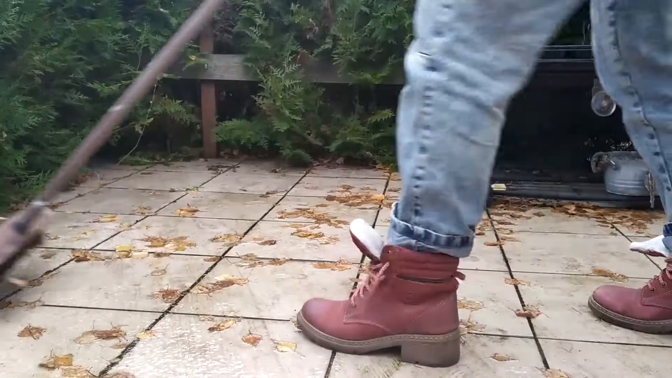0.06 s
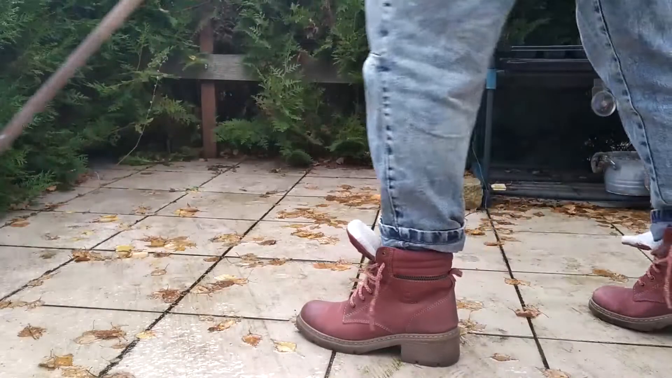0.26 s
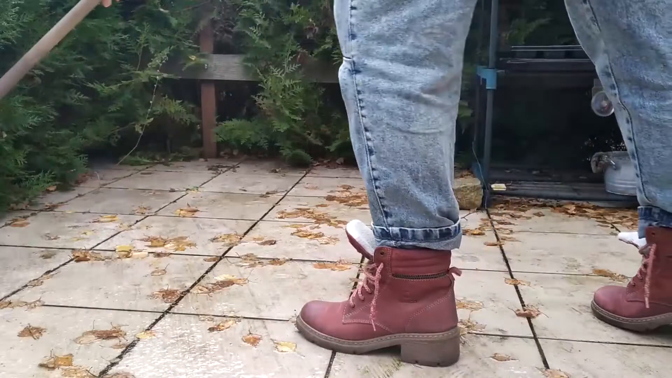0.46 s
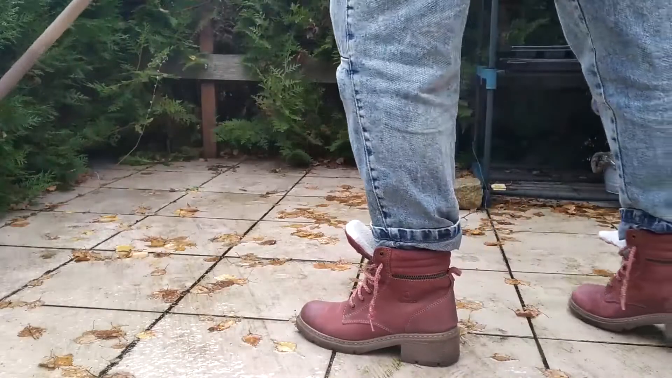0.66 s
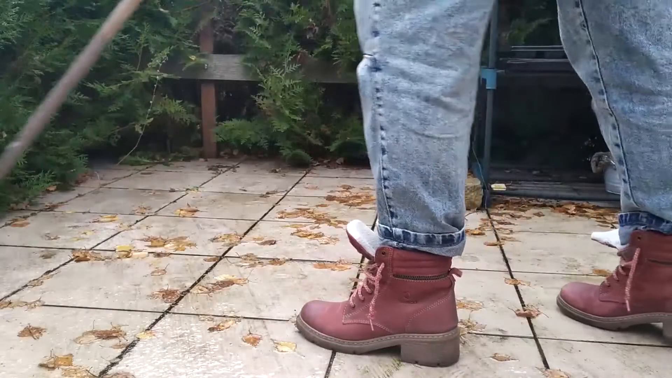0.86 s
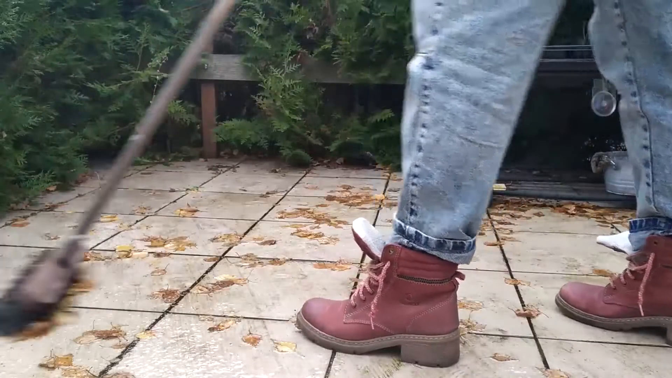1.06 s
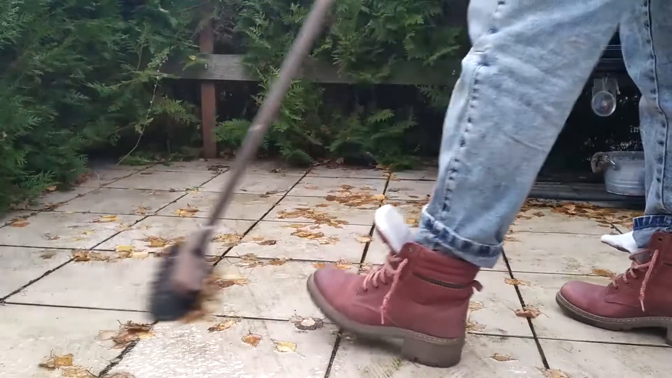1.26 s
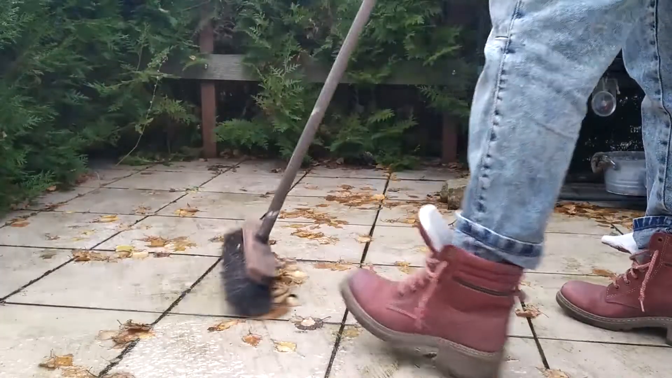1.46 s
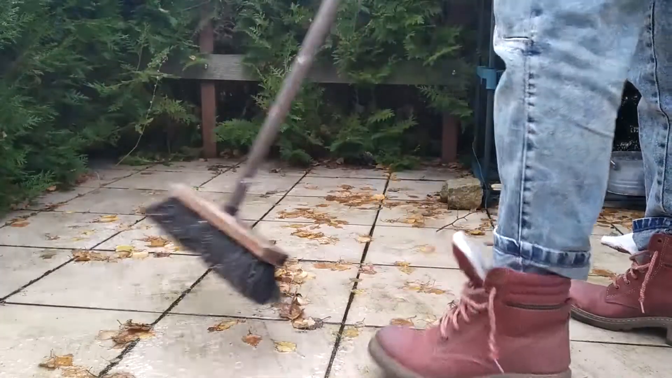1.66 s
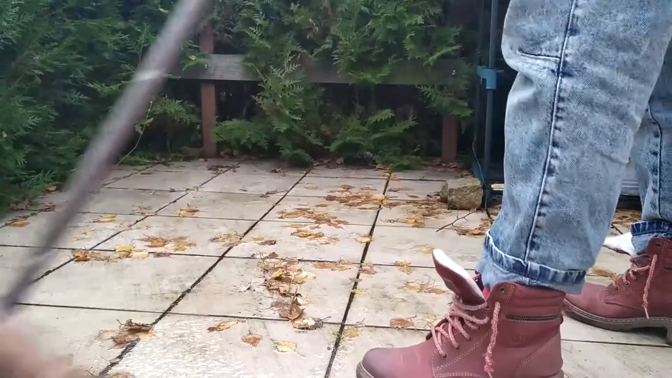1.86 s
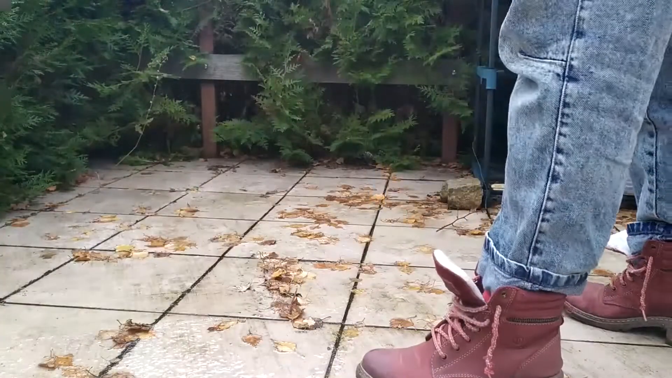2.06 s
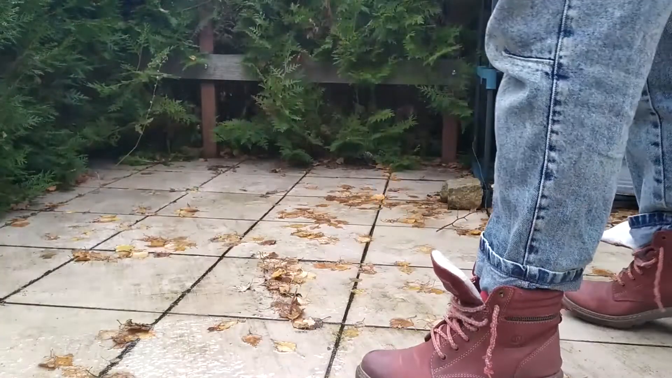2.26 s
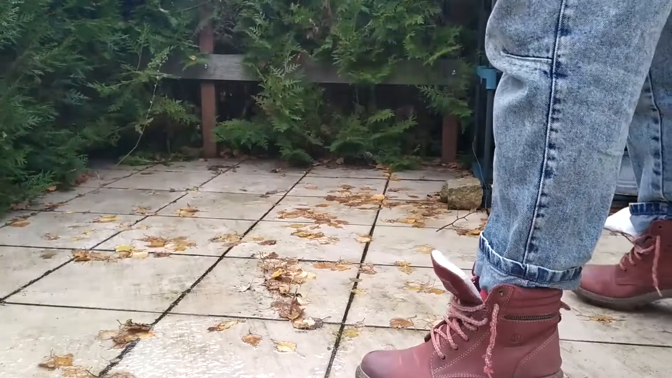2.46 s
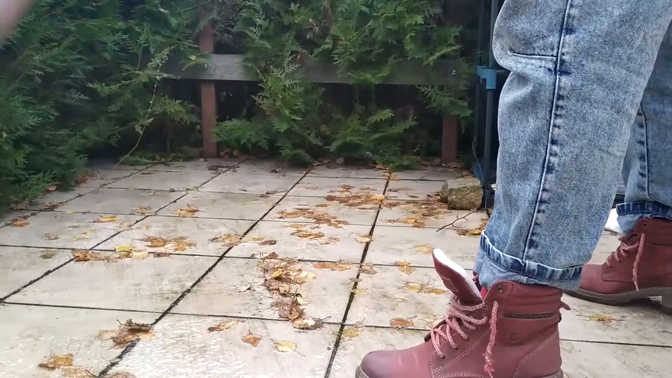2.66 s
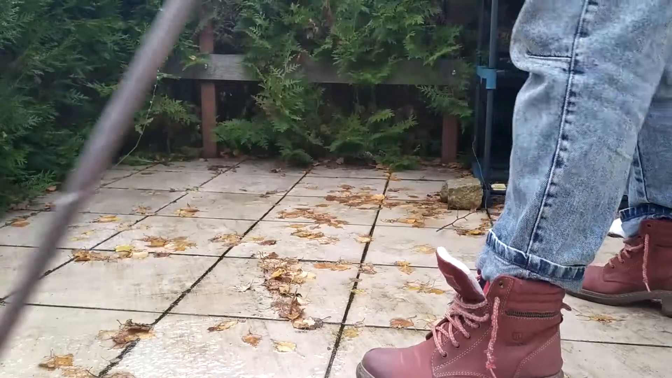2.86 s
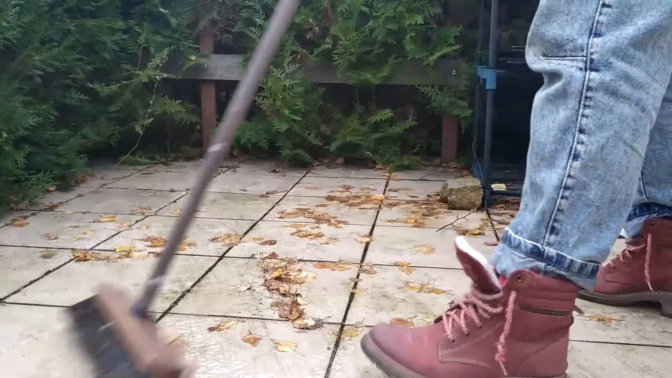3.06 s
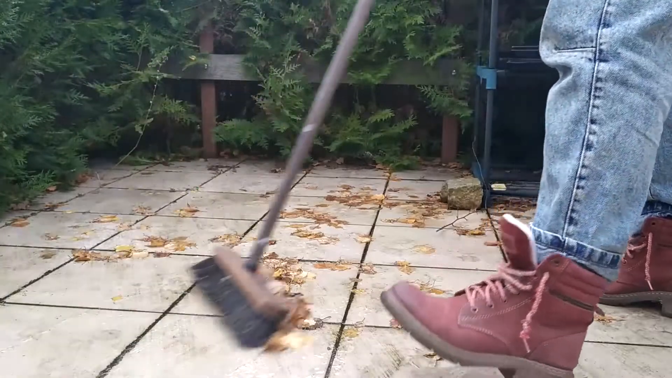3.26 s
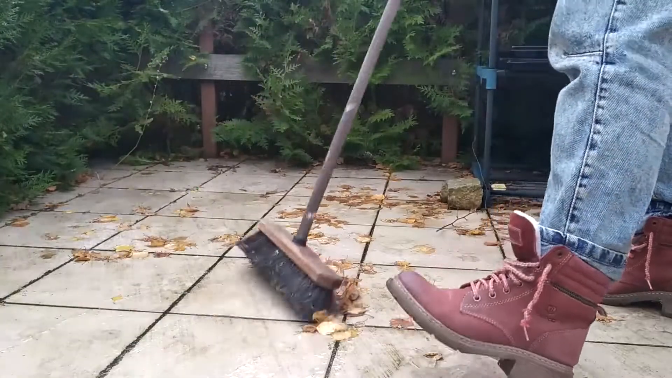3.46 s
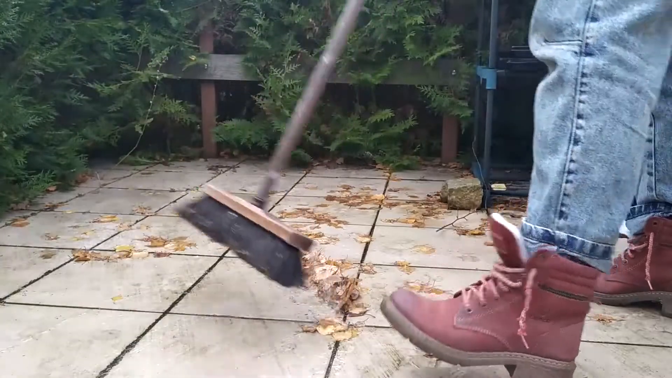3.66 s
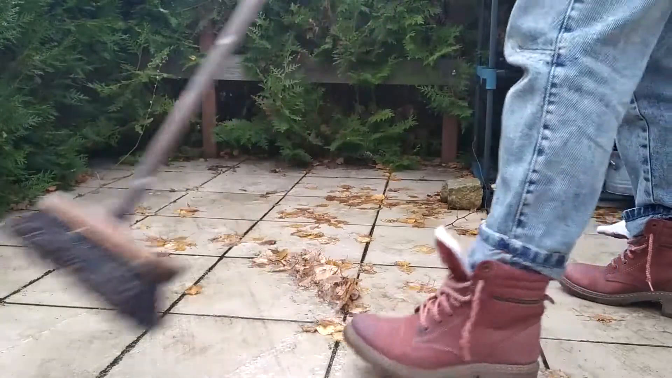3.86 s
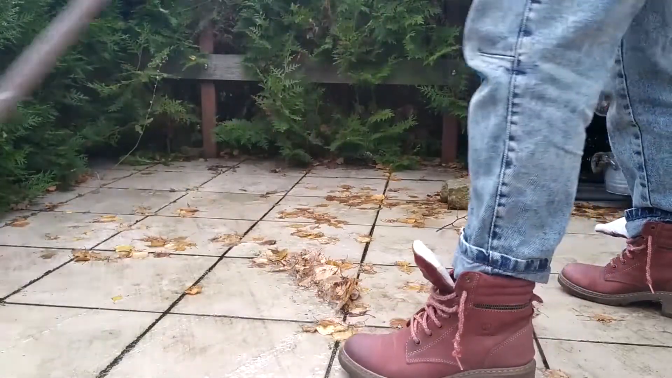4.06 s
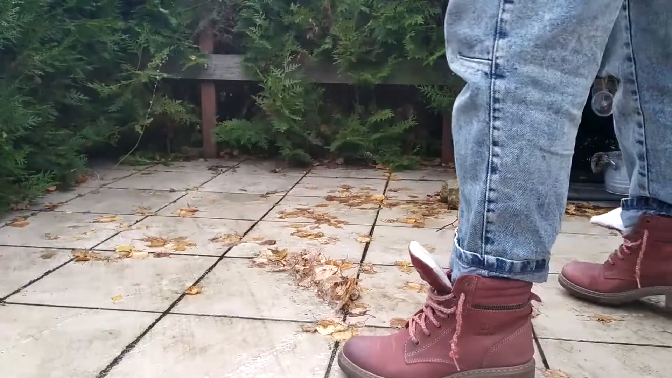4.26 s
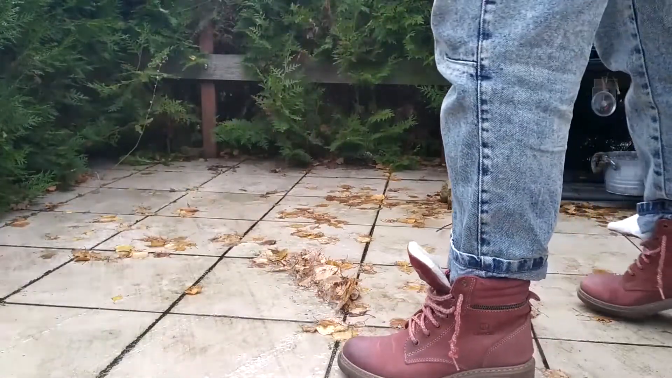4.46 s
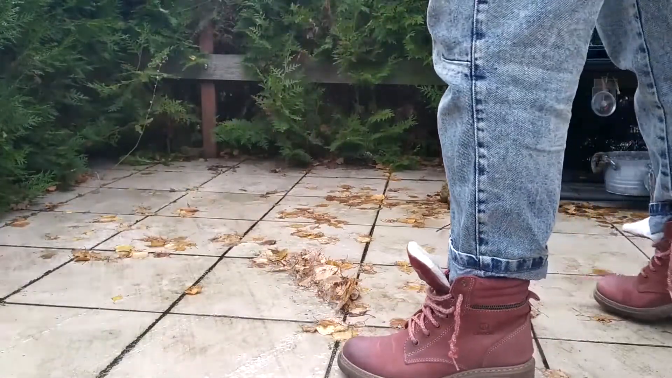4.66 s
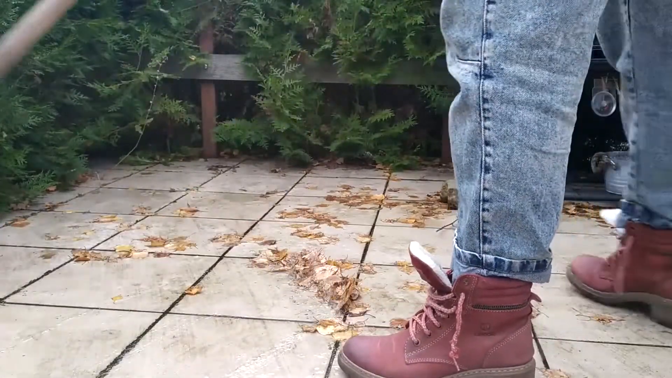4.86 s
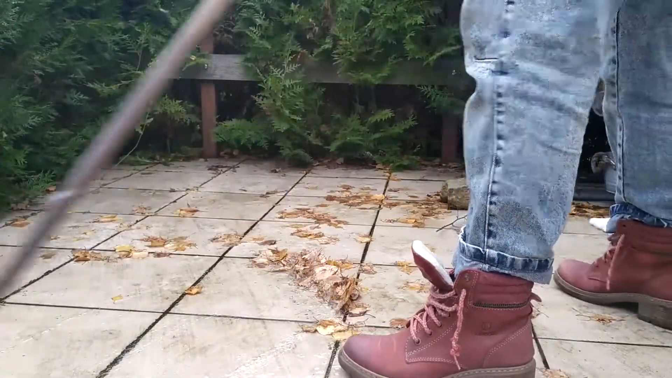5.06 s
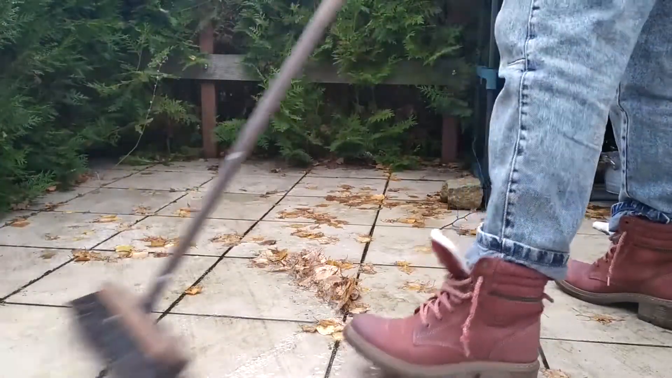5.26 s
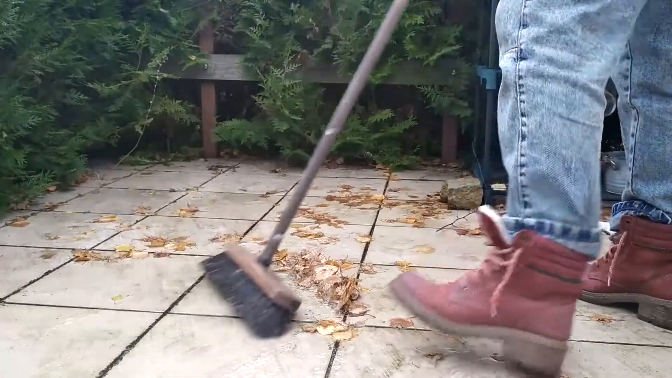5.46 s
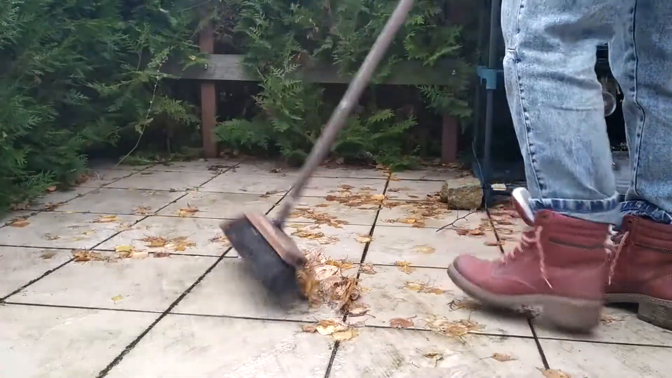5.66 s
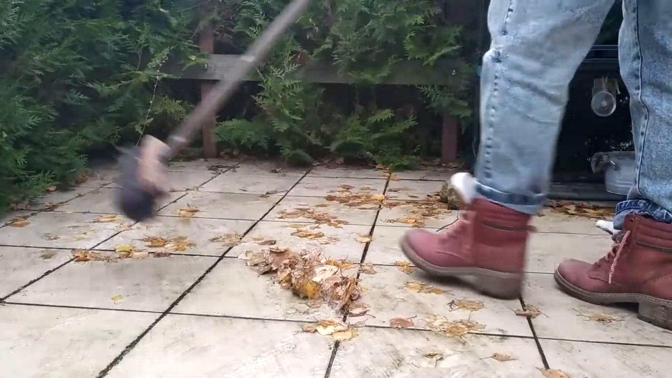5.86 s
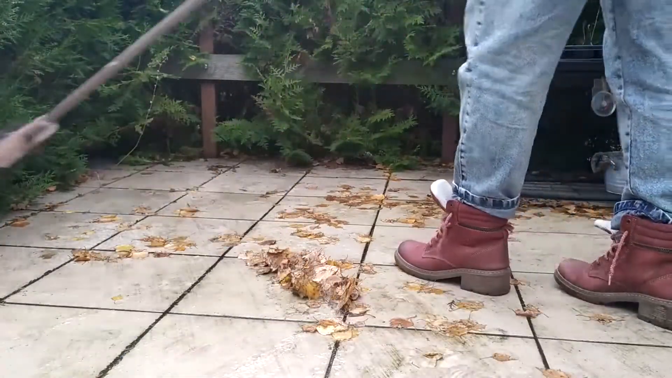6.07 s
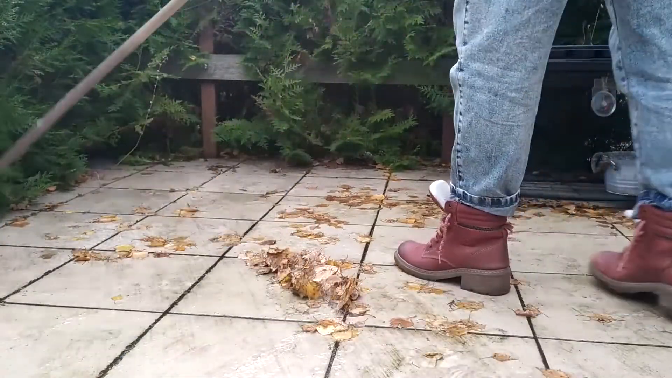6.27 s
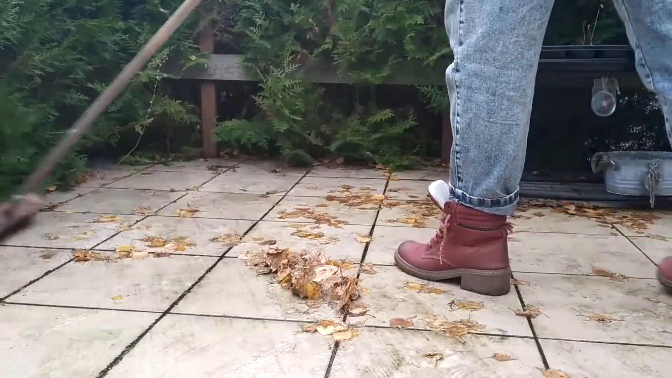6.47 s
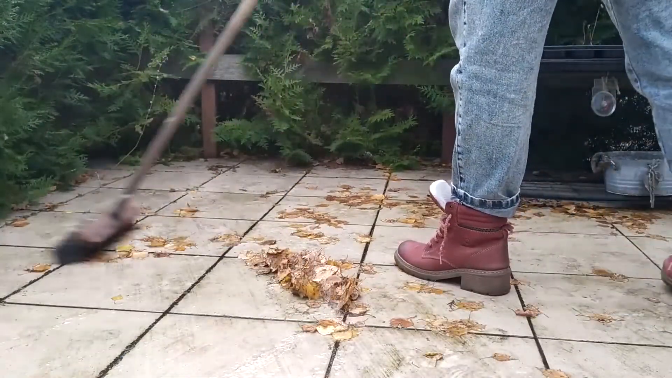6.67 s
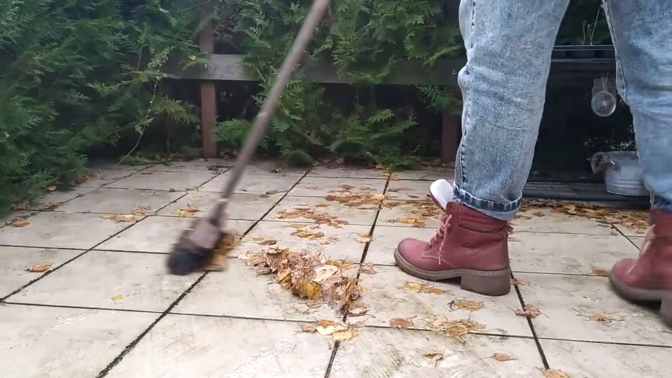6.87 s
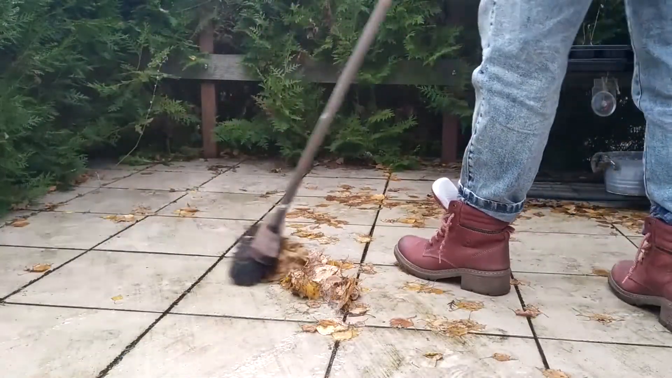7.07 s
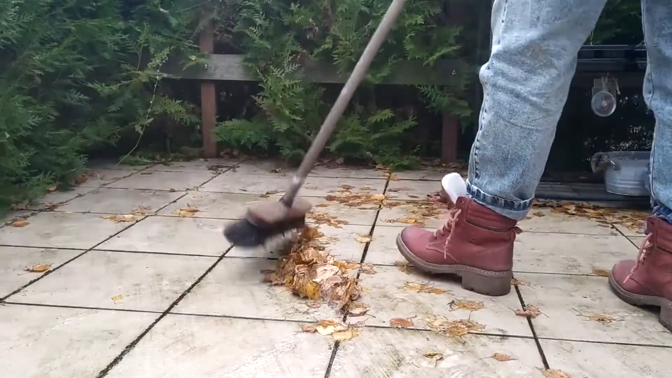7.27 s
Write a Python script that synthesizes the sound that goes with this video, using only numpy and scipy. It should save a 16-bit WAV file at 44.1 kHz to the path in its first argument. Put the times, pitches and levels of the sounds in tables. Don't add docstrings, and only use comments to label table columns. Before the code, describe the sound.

A stiff broom sweeps dry leaves over paving slabs in five bright, bristly strokes, with leaf snaps, soft boot knocks and faint distant traffic.

```python
import sys
import numpy as np
from scipy import signal
from scipy.io import wavfile
from scipy.ndimage import uniform_filter1d, map_coordinates

SR = 44100
rng = np.random.default_rng(int(sys.argv[2]) if len(sys.argv) > 2 else 0)


def volts(x):
    e = np.asarray(x, float) / 20
    return 10 ** e


def to_wav(s):
    ch = np.atleast_2d(s).T
    pcm = np.round(np.clip(ch, -1, 1) * 32767)
    wavfile.write(sys.argv[1], SR, pcm.astype(np.int16))


N = 322371

# t/s, hiss level (pressure)/dB, lag of left port/ms
STROKES = [
    [(0.25, -69, .2), (0.3, -53.5, 0.29), (0.38, -52, 0.25), (0.46, -54.5, 0.32), (0.56, -54, 0.29),
     (0.64, -76, 0.18)],
    [(0.64, -67, 0.21), (0.72, -54.5, 0.32), (0.86, -52, 0.28), (0.93, -47.5, 0.27), (1.06, -47, 0.24),
     (1.28, -52, 0.14), (1.42, -52.5, 0.064), (1.585, -58, 0.034), (1.68, -75.5, .03)],
    [(2.47, -61, 0.36), (2.54, -59, 0.43), (2.71, -48, 0.35), (2.89, -46.5, 0.33), (3.1, -46, 0.16),
     (3.36, -49.5, .09), (3.5, -54, .004), (3.65, -69, .003), (3.73, -83, .02)],
    [(4.59, -63, 0.44), (4.73, -52, 0.42), (4.91, -46.5, .36), (5.1, -46, 0.3), (5.3, -46, 0.17),
     (5.46, -46.5, 0.081), (5.68, -52.5, 0.051), (5.76, -68.5, 0.038), (5.83, -86, .04)],
    [(6.47, -62.5, 0.23), (6.6, -52.5, 0.26), (6.76, -49, 0.15), (6.86, -49.5, 0.12), (6.97, -53.5, 0.13),
     (7.04, -53.5, 0.085), (7.19, -52.5, 0.045), (7.31, -66, .015)],
]
# scrape re hiss at start/dB, at end/dB,
# brightness re hiss at start/dB, at end/dB, extra scatter of a head set askew/dB
GROUND = [
    (-11.5, -20, 0.1, 0.1, 1),
    (-15, -11, 2.5, 0.13, 0),
    (-10, -9, -5.5, 0.12, 3),
    (-13, -14, -0.5, 0.46, 0.5),
    (-22.5, -5.5, 4, 0.9, 4),
]
# t of full contact/s, hold/s, hiss level/dB, lag/ms,
# scrape re hiss/dB
DABS = [(0.116, 0.025, -67.5, -.08, -5.5), (1.058, 0.039, -42.5, 0.22, -16.5), (2.004, .01, -72, 0.15, -16),
        (2.075, 0.045, -71, 0.19, -6), (2.147, .005, -69.5, 0.22, -13), (2.454, .008, -52, .38, -8.5),
        (4.516, 0.035, -49, .43, -10.5), (5.783, .005, -66.5, .03, -6), (5.9, .02, -72, -.03, -7.5),
        (6.256, .02, -61.5, -0.216, -9.5), (6.433, 0.0093, -52.5, 0.22, -10.5),
        (6.787, .008, -44, 0.18, -13.5)]
# f/Hz, level per Hz/dB
BRISTLES = [(470, -47), (800, -22.5), (1920, -12.5), (3220, -7.5), (4800, -5), (8770, 4), (15000, 1),
            (16000, -8)]
# f/Hz, share of the shading/1
SHADE = [(1000, 0), (4500, 0), (6500, 0.37), (8000, 1.3), (10000, 2.5), (16000, 2.5)]
# f/Hz, level re direct/dB
SCATTER = [(1000, -14.5), (3000, -9), (5000, -2.5), (8000, -2), (16000, 11)]
# t/s, peak level/dB, f/Hz, left-right difference/dB
SNAPS = [(0.0706, -31.5, 12800, 31), (0.0804, -47, 11300, 19), (0.2984, -38, 8800, 6),
         (0.5984, -46, 9400, 11), (1.0751, -43, 10500, 22), (1.0776, -32, 11150, 13),
         (1.812, -42, 10000, 14), (1.8135, -39, 10200, 18), (1.822, -40, 10100, 22),
         (2.0067, -53, 11100, 11), (2.019, -49, 10600, 14), (2.4476, -43, 9500, 3),
         (3.2542, -30, 11500, 12), (3.676, -45.5, 8100, 13), (3.6795, -42, 8500, 17),
         (3.9073, -41, 6900, 8), (3.9175, -33, 10200, 22), (3.9677, -50, 10500, 19),
         (4.0166, -40, 7760, 16), (6.024, -46, 10000, 16), (6.047, -46, 8300, 13), (6.0496, -40, 9100, 17),
         (6.056, -51, 9300, 17), (6.0669, -48, 10400, 13), (6.1051, -34, 11600, 24),
         (6.1139, -47, 11400, 18), (6.419, -31.5, 10900, 21), (6.4303, -35, 11800, 16),
         (6.432, -29, 8700, 15), (6.5209, -38, 11800, 11)]
# t/s, peak level/dB, f/Hz, left-right difference/dB
TWIG = [
    (1.0742, -16, 10300, 13),
    (1.0756, -22, 11100, 12),
    (1.0625, -28, 6000, 6),
]
# t/s, length/s, level/dB, centre f/Hz, shading of the right port/dB
SCUFFS = [(0, 0.04, -55.5, 9900, 28), (0.05, 0.028, -55, 4860, 4), (0.058, 0.026, -54, 10000, 18),
          (1.785, 0.035, -58, 9450, 14), (1.81, 0.024, -57, 10500, 16), (1.805, 0.043, -55, 6160, 2),
          (1.833, 0.037, -58, 9900, 14), (2.006, 0.015, -58, 11000, 8), (3.888, .02, -56, 11000, 11),
          (3.897, 0.023, -58.5, 6630, -2), (3.92, .04, -59, 10000, 13), (3.966, .03, -67, 10000, 9),
          (4.007, 0.019, -58, 8000, 6), (4.138, .04, -63.5, 8000, 12), (4.273, .02, -63, 8580, 11),
          (6.014, 0.025, -55.5, 10300, 9), (6.042, 0.03, -47.5, 8800, 14), (6.063, .02, -62, 12500, 12),
          (6.043, 0.067, -59, 3770, 3), (6.093, 0.021, -57, 9000, 14), (6.428, 0.016, -53, 9500, 12)]
# t/s, peak level/dB, f/Hz, overtone level/dB, crack level/dB
KNOCKS = [(0.0571, -38.5, 660, -0.5, 2.5), (0.0769, -46, 1280, -3, 3), (0.094, -40.5, 192, -6, -8),
          (0.13, -40, 670, -22, -10), (0.2032, -26.5, 1210, -42, -18), (0.257, -59, 885, 1, 3),
          (1.206, -51, 530, -4, -13), (1.81, -42, 182, -8, -12), (4.992, -38, 258, -7, -16),
          (5.232, -49, 260, 3, -20), (5.275, -47, 487, -14, -14), (6.019, -48, 194, -17, -18),
          (6.06, -50, 187, 1, -2), (6.085, -49.5, 197, 0.5, -2), (6.103, -63, 654, 11, 8),
          (6.442, -61, 392, 6, -13), (6.808, -34.5, 293, -9.5, -11), (6.9641, -33, 288, -10.5, -24)]
# t/s, fourth order f/Hz, fourth order level/dB, third order level/dB, second order level/dB
REV = [
    (5.25, 352, -83, -95, -90),
    (5.42, 365, -78, -85, -89),
    (5.65, 378, -70.5, -106, -92),
    (5.95, 393, -63, -101, -80),
    (6.1, 399, -69, -71, -70),
    (6.3, 404, -81, -80.5, -78),
    (6.6, 410, -84, -78.5, -83),
    (6.9, 414, -81, -100, -72),
]
# start t/s, end t/s, f/Hz, level/dB
DRONES = [
    (0.72, 1.047, 425, -86.5),
    (1.9, 2.2, 240, -88.5),
    (2.7, 2.75, 170, -91),
    (5.58, 5.89, 1000, -102),
    (5.08, 5.22, 680, -85),
    (5.667, 5.82, 472, -83),
]
# f/Hz, level per Hz/dB
BACKGROUND = [(13, -39), (22, -33), (50, -0.5), (76, 3), (97, -5.5), (152, -16.5), (217, -18.5),
              (653, -19.5), (988, -19), (1620, -26.5), (3320, -32), (7000, -31.5), (9740, -32.5), (14700, -36),
       (16000, -38)]
YARD = BACKGROUND
# t/s, level/dB
RUMBLE = [(0.0, -61.5), (0.75, -60), (1.1, -61.5), (2.4, -62.5), (3.0, -60.5), (3.3, -61), (4.5, -60),
          (4.72, -57), (4.97, -59.5), (5.45, -60), (5.8, -61), (7.1, -61.5), (7.31, -59)]
# f/Hz, left-right likeness/1
LIKENESS = [(30, 1), (200, 0.88), (500, 0.56), (1000, 0), (2000, 0), (16000, 0.045)]

DAB_FALL_DB_PER_S = 317


def in_time(rows):
    s, *columns = np.transpose(rows)
    return [np.interp(np.arange(N) / SR, s, c) for c in columns]


def at_hz(points, hz):
    f, value = np.array(points)[:, 0], np.array(points)[:, 1]
    return np.interp(np.log(hz), np.log(f), value)


def rms_one(x):
    return x / np.sqrt(np.mean(x ** 2) + 1e-20)


def drift(rate):
    hop = 40
    r = np.exp(-2 * hop * np.pi * rate / SR)
    slow = signal.lfilter([1], [1, -2 * r, r * r], rng.standard_normal(N // hop + 2002))
    slow = slow[2000:]
    return np.interp(np.arange(N) / hop, np.arange(len(slow)), rms_one(slow))


def band(x, low, high):
    return signal.sosfilt(signal.butter(2, [low, high], "band", fs=SR, output="sos"), x)


def later(x, ms):
    return map_coordinates(x, [np.arange(N) - ms * SR / 1000], order=3, mode="nearest")


def ring(length, hz, t60):
    t = np.arange(length) / SR
    return np.sin(2 * np.pi * hz * t) * volts(-60 * t / t60)


def slips(per_s, spread_db):
    heights_db = spread_db * np.minimum(rng.exponential(1, N), 5)
    sizes = volts(heights_db) * rng.standard_normal(N)
    return rms_one(sizes * (rng.random(N) < per_s / SR))


def contact():
    dab_rise_db_per_s, dab_bright_db = 157, -2.5
    dab_scatter_db = 4.5
    t = np.arange(N) / SR
    now = np.zeros((5, N)) - [[100], [0], [10], [0], [0]]
    for rows, (scrape_db, scrape_end_db, bright_db, bright_end_db, askew_db) in zip(STROKES, GROUND):
        db, lag = in_time(rows)
        ends = [rows[0][0], rows[-1][0]]
        outside = np.maximum(0, np.maximum(ends[0] - t, t - ends[1]))
        db = db - DAB_FALL_DB_PER_S * outside
        scrape = np.interp(t, ends, [scrape_db, scrape_end_db])
        bright = np.interp(t, ends, [bright_db, bright_end_db])
        now = np.where(db > now[0], [db, lag, scrape, bright, askew_db + 0 * t], now)
    for s, hold, peak_db, lag, scrape_db in DABS:
        rise = dab_rise_db_per_s * np.maximum(0, s - t)
        fall = DAB_FALL_DB_PER_S * np.maximum(0, t - s - hold)
        db = peak_db - rise - fall
        settings = [lag, scrape_db, dab_bright_db, dab_scatter_db]
        now = np.where(db > now[0], [db, *(value + 0 * t for value in settings)], now)
    return [now[0], *uniform_filter1d(now[1:], size=900, axis=1)]


def broom():
    firm_db = -48
    hiss_db, lag, scrape_db, bright_db, askew_db = contact()
    light_db = np.clip(firm_db - hiss_db, 0, 20)
    shade_db = 9 - 14.5 * lag + 0.1 * light_db
    spread_db = np.minimum(-0.7 + 0.3 * light_db, 18) + askew_db
    paths = np.array([[slips(16000, spread_db=-0.5) for path in range(3)] for turn in range(2)])
    heard = np.zeros((2, 3, N))
    edges = 800 * 2 ** np.arange(0, 4.5, 1 / 3)
    together = drift(9)
    for k, (low, high) in enumerate(zip(edges, edges[1:])):
        hz = np.sqrt(low * high)
        scrape_tilt_db = np.interp(hz, [3500, 6000], [1, 0]) * (scrape_db + 14)
        bright_tilt_db = np.interp(hz, [10000, 12500], [0, 1]) * bright_db
        gain_db = hiss_db + scrape_tilt_db + bright_tilt_db + at_hz(BRISTLES, hz)
        gain_db += 0.8 * together + 1.5 * drift(14) + 0.9 * drift(40)
        loose = volts(at_hz(SCATTER, hz) + spread_db)
        shares = np.array([np.ones(N), loose, loose]) / np.sqrt(1 + loose ** 2)
        part = volts(gain_db + 8) * shares * band(paths[k % 2], low, high)
        heard[0] += part
        heard[1] += part * volts(-at_hz(SHADE, hz) * shade_db)
    left = later(heard[0, 0], lag / 2) + heard[0, 1]
    right = later(heard[1, 0], -lag / 2) + heard[1, 2]
    return np.array([left, right])


def snaps():
    events, length = SNAPS + TWIG, 900
    out = np.zeros((2, N + length))
    chance = rng.standard_normal((len(events), length))
    crackle_fall = volts(-60 * np.arange(length) / SR / 0.007)
    for (s, db, hz, pan_db), noise in zip(events, chance):
        raw = ring(length, hz, 9 / hz) + 0.35 * noise * crackle_fall
        sound = band(raw, hz * 0.68, min(hz * 1.45, 17000))
        ports = volts(np.array([[0], [-1]]) * pan_db)
        out[:, round(s * SR):][:, :length] += volts(db + 6) * sound * ports
    return out[:, :N]


def scuffs():
    grit = slips(9000, spread_db=2.2)
    ports = np.array([grit, 0.067 * grit + grit[::-1]])
    out, t = np.zeros((2, N)), np.arange(N) / SR
    for s, length, db, hz, shade_db in SCUFFS:
        span = slice(round(s * SR), round((s + 2 * length) * SR))
        fall = np.clip(2 - (t[span] - s) / length, 0, 1) ** 2
        burst = band(ports[:, span] * fall, hz * 0.7, min(hz * 1.31, 15800))
        out[:, span] += volts(db - np.array([[0], [shade_db]])) * burst
    return out


def knocks():
    length, echo = 4000, 480
    out, t = np.zeros(N + 5000), np.arange(length) / SR
    chance = rng.standard_normal((len(KNOCKS), length))
    for (s, db, hz, over_db, crack_db), noise in zip(KNOCKS, chance):
        t60 = 6.04 / hz
        scuff = band(noise * volts(-60 * t / (2.5 * t60)), hz * 0.6, hz * 2.6)
        overtone = ring(length, 1.84 * hz, 0.42 * t60)
        sound = ring(length, hz, t60) + volts(over_db) * (overtone + 2.53 * scuff)
        sound *= 1.35 * (1 - np.exp(-(t * hz / 0.52) ** 2))
        crack = ring(length, 1400, 0.005) + 0.7 * ring(length, 2900, 0.003)
        sound += volts(crack_db) * crack
        start = round(s * SR)
        out[start:][:length] -= volts(db) * sound
        out[start + echo:][:length] -= volts(db - 13.5) * sound
    return out[:N] * volts(np.array([[0.6], [-0.6]]))


def engine():
    hz, *levels_db = in_time(REV)
    t = np.arange(N) / SR
    turn = 2 * np.pi * np.cumsum(hz) / SR / 4
    out = np.zeros(N)
    for order, db in zip((4, 3, 2), levels_db):
        out += volts(db + 3 + 2.8 * drift(5)) * np.sin(order * turn)
    out = out * (t > REV[0][0]) * (t < REV[-1][0])
    for start, end, drone_hz, db in DRONES:
        fade = np.clip(np.minimum(t - start, end - t) / 0.034, 0, 1)
        out += volts(db + 11) * fade * np.sin(2 * np.pi * drone_hz * t)
    return out


def yard():
    yard_db = -59.5
    swell_db, = in_time(RUMBLE)
    out, edges = 0, 22 * 2 ** np.arange(0, 9.6, 0.5)
    white = rng.standard_normal((2, 2, N))
    for k, (low, high) in enumerate(zip(edges, edges[1:])):
        mid, side = band(white[k % 2], low, high)
        hz = np.sqrt(low * high)
        alike = np.clip(at_hz(LIKENESS, hz), -1, 1)
        rumble_db = (hz < 140) * (swell_db - swell_db.mean())
        gain = volts(at_hz(YARD, hz) + drift(1.64) + rumble_db)
        out = out + gain * (np.sqrt(1 + alike) * mid + np.sqrt(1 - alike) * side * [[1], [-1]])
    return volts(yard_db) * rms_one(out) * volts(np.array([[0.6], [-0.6]]))


def scene():
    return broom() + snaps() + scuffs() + knocks() + engine() + yard()


def top_cut(x):
    return signal.sosfilt(signal.butter(12, 15870, fs=SR, output="sos"), x)


def record(dry):
    cut = signal.sosfilt(signal.cheby2(14, 45, 16000, fs=SR, output="sos"), dry)
    return top_cut(cut)


dry = scene()
out = record(dry)
to_wav(out)
```